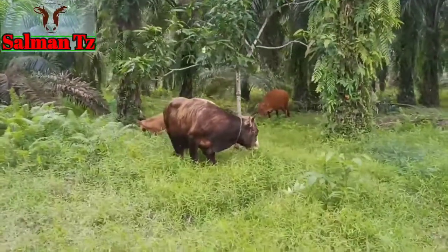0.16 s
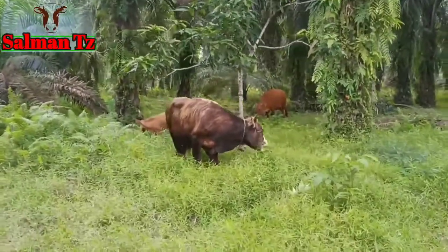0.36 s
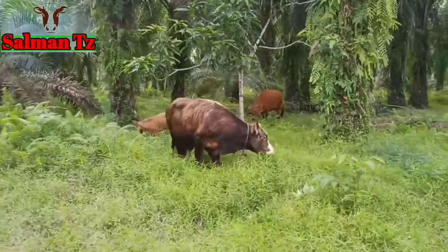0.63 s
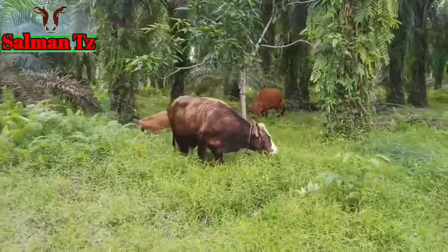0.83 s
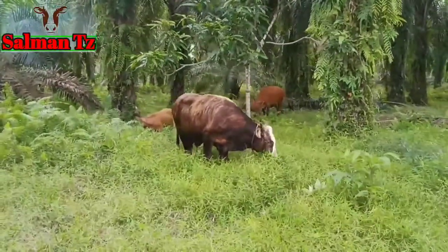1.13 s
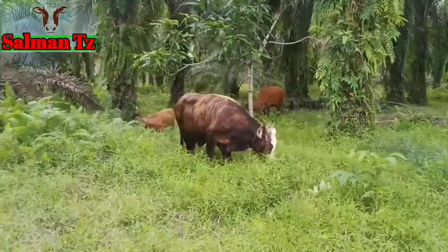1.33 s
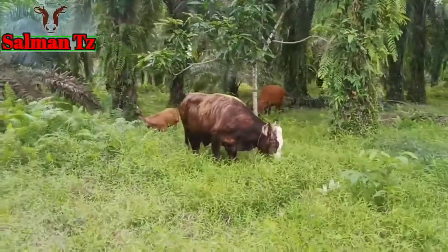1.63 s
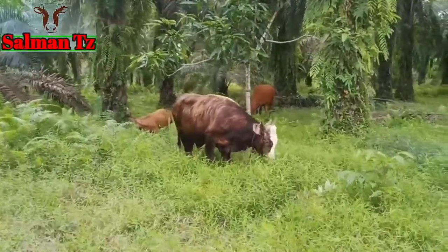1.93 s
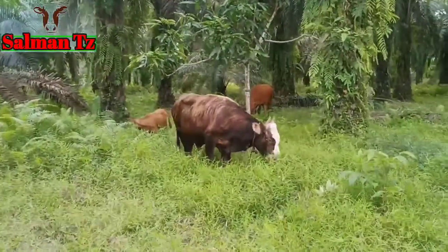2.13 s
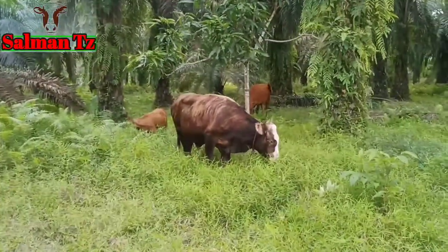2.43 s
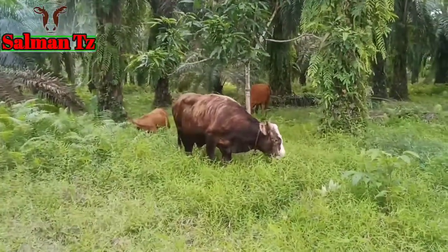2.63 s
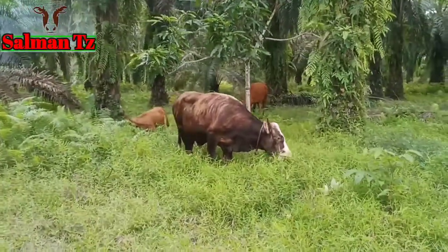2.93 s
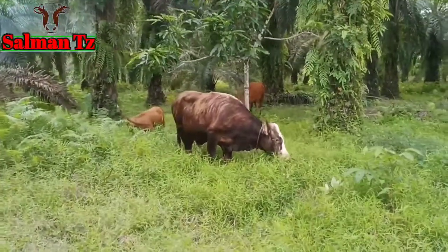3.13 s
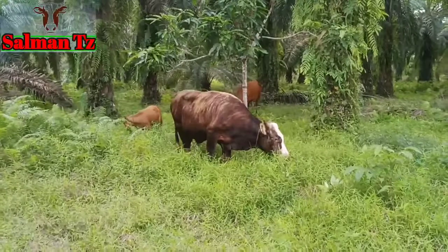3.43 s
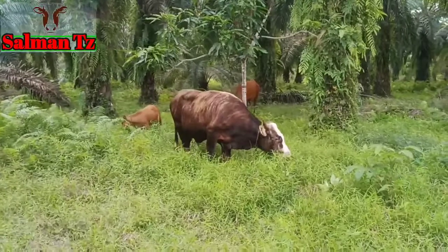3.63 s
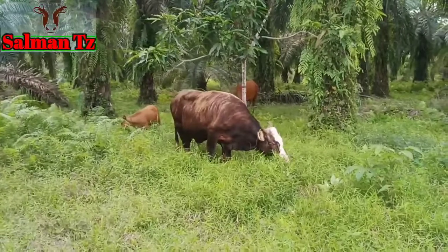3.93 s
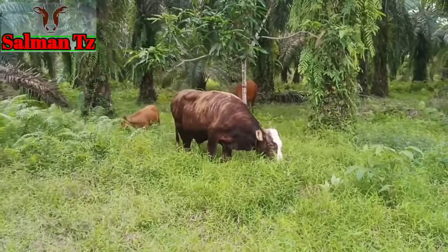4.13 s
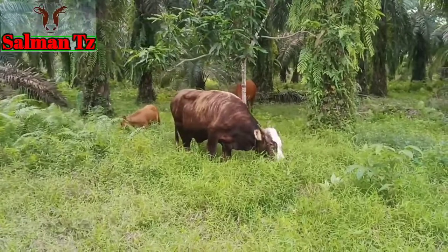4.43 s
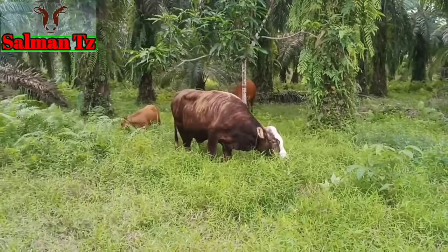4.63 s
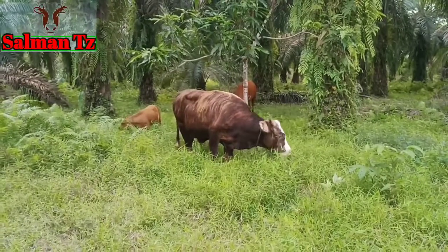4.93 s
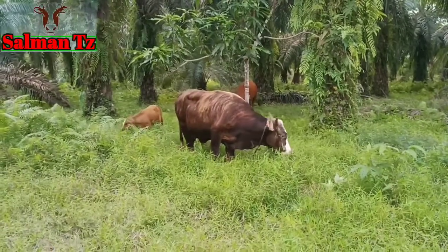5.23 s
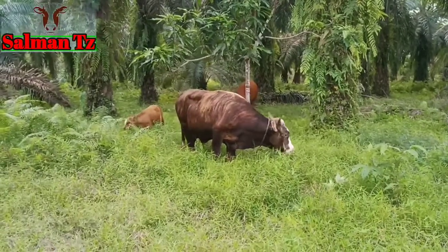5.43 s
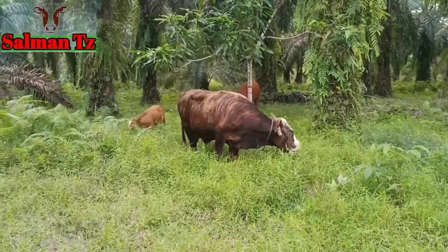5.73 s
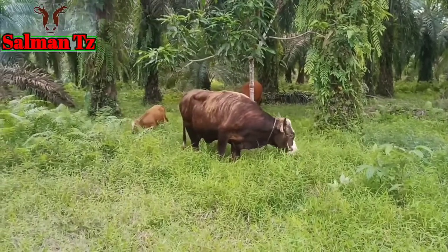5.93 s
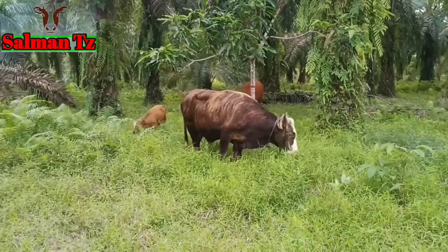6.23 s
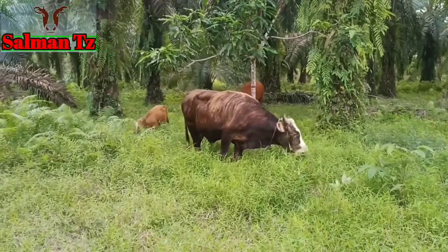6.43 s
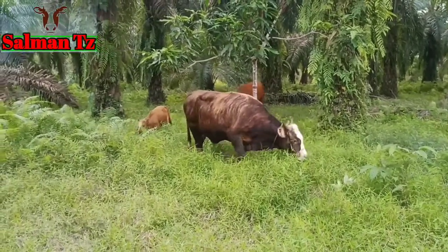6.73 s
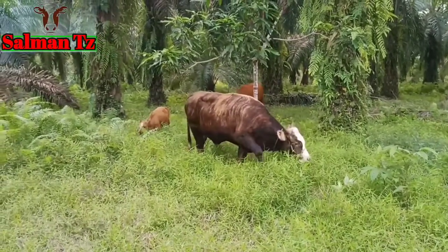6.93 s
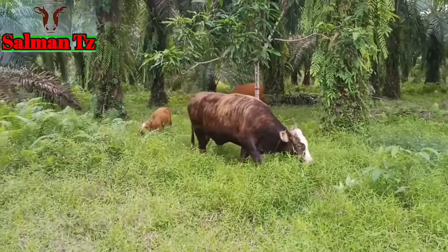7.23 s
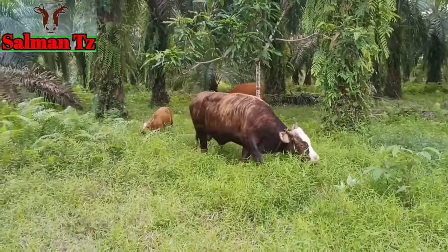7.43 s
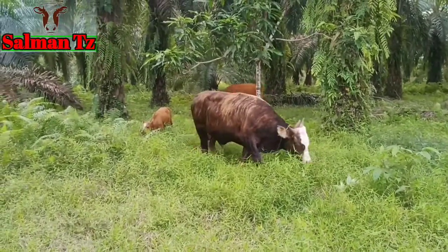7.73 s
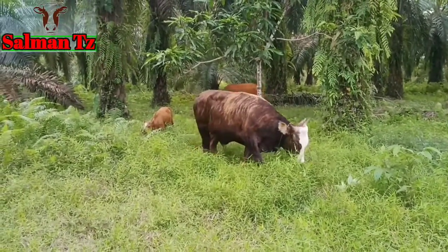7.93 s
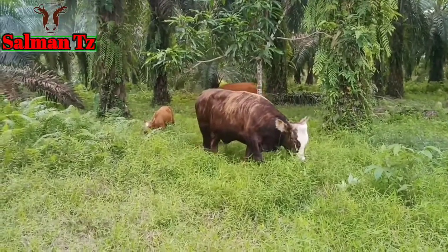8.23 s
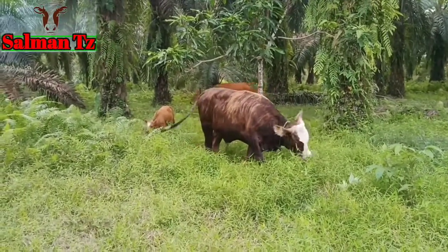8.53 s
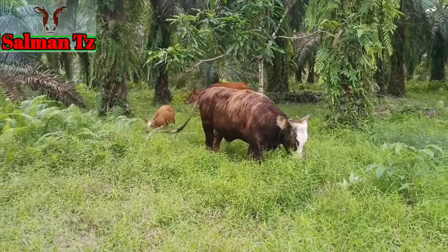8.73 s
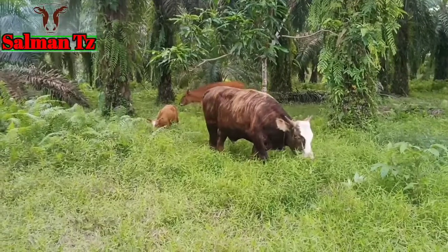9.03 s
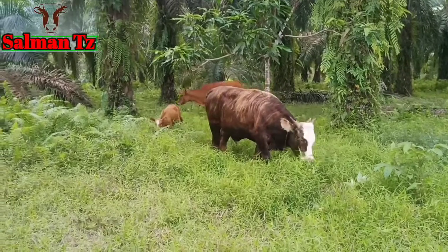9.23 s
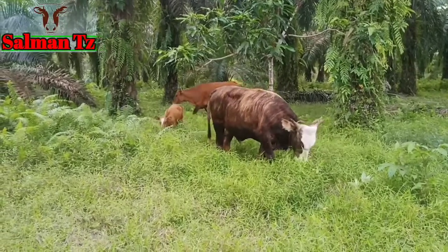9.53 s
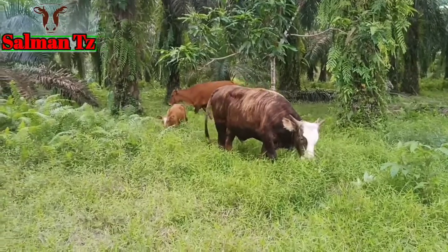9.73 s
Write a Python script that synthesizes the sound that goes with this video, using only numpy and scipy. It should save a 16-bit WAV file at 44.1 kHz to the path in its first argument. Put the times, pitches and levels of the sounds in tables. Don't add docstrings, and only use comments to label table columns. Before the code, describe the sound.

Cattle tear and crop grass close by with crisp snaps and ticks, under thin high insect whine, a chirping cricket and faint distant engines.

```python
import sys
import numpy as np
from scipy import signal
from scipy.fft import rfft, irfft, next_fast_len
from scipy.io import wavfile
from scipy.ndimage import uniform_filter1d

SR = 44100
rng = np.random.default_rng(int(sys.argv[2]) if len(sys.argv) > 2 else 0)


def makeup_ratio(level_db):
    decades = np.asarray(level_db, float) / 20
    return 10 ** decades


def waveform_to_disk(signal):
    frames = np.transpose(np.atleast_2d(signal))
    scaled = np.clip(frames, -1, 1) * 32767
    samples = np.round(scaled).astype(np.int16)
    wavfile.write(sys.argv[1], SR, samples)


N = 435311

# [f/Hz, density/dB per Hz]
AIR_SPECTRUM = [(26, -18), (50, -3), (90, 0), (146, 0), (250, -9.5), (700, -21.5), (2200, -35), (3500, -28),
                (4600, -19.5), (5600, -27), (6400, -34), (7700, -29), (12300, -26.5), (15600, -8.5)]
AIR_DB = -52.5

# [t/s, level/dB, fineness/dB]
STIR = [(0, -57, -19), (.6, -56.5, -4.5), (1.3, -54, -5), (2.2, -62, -5), (3.3, -60, -7), (3.65, -72, -4),
        (4.7, -72, -6), (6.4, -68.5, 3), (7.45, -61.5, -0.5), (8.2, -63.5, 0), (8.75, -67.5, -5),
        (9.4, -63.5, -2.5), (9.87, -70.5, 7)]
# [start/s, hold/s, level/dB, fineness/dB]
SWEEPS = [(0, 0.08, -47, -9.5), (0.11, 0.044, -46.5, -9), (0.204, .04, -57, -10), (0.917, 0.062, -53, -2.5),
          (1.07, 0.045, -52, -9), (1.367, 0.19, -53.5, -13.5), (1.73, .02, -61, -10),
          (1.91, 0.034, -64, -2), (2.117, 0.047, -56, 0), (2.324, .03, -57, -1), (2.378, .03, -48, -6),
          (2.44, 0.046, -46, -9), (2.527, .04, -46.5, -9), (2.6, 0.076, -46.5, -8.5),
          (2.72, 0.11, -49.5, -10.5), (3.03, 0.02, -67, 8), (4.035, 0.22, -65.5, 2), (4.478, 0.033, -73, 2),
          (5.016, 0.031, -58.5, 1), (5.52, 0.033, -73, 0), (5.85, 0.025, -69, 9), (6.14, 0.027, -60, 0.5),
          (6.519, 0.048, -66, 3), (6.871, .1, -58.5, 0), (7.052, 0.024, -54, 4), (7.11, 0.048, -50.5, 2),
          (7.608, .08, -62.5, 4), (7.757, 0.074, -57, 4), (7.876, 0.096, -53, 0.5), (8.077, 0.018, -57, 4),
          (8.39, 0.085, -61.5, 1), (8.866, 0.04, -60.5, 4), (9.067, 0.028, -67, 5),
          (9.255, 0.033, -60.5, 4.5), (9.593, 0.049, -57, 3), (9.71, 0.11, -64, -6)]
RISE_DB_PER_S, FALL_DB_PER_S = 139, 148
LONG_SWEEP_S = 1
QUIET_DB = -72
# [f/Hz, density/dB per Hz]
SWISH_SPECTRUM = [(1600, -79), (2500, -11), (3490, -4.5), (4120, 0.5), (5900, -5.5), (7070, -0.5),
                  (8800, -21), (11800, -20.5), (13200, -14.5), (14900, -2), (15700, -11)]
# [f/Hz, density/dB per Hz]
HISS_SPECTRUM = [(5000, -72), (7600, 5.5), (9000, 5.5), (10500, -2), (12500, -7), (15700, -2)]
# [f/Hz, density/dB per Hz]
RUSTLE_SPECTRUM = [(800, -0.5), (1300, 5), (2000, 5), (3000, 3), (4200, -7)]
# [f/Hz, density/dB per Hz]
SHUFFLE_SPECTRUM = [(200, -5), (350, 4.5), (700, 3.5), (1100, -7), (1700, -42)]
# [quiet level/dB, share of swing, dB per dB of fineness, slowness]
RUSTLE_LAW = (-76.5, 0.5222, -0.58, 1.5)
SHUFFLE_LAW = (-73, 0.393, 0.02, 1)
TEARING_LAW = (-87.5, 1.0558, -0.98, 0.5)
PATCH_RATE_HZ, SWISH_PATCHY_DB = 12, .4

# [t/s, level/dB]
CHORUS_LEVEL = [(0.0, -57), (0.3, -57.5), (0.85, -53.5), (1.24, -73), (1.65, -55), (2.14, -60.5),
                (2.53, -49), (2.83, -56.5), (5.66, -60), (5.97, -58), (6.4, -60.5), (6.98, -59),
                (7.51, -58), (8.91, -58), (9.46, -56.5), (9.87, -58.5)]
# [f/Hz, width/Hz, level/dB]
CHORUS_BANDS = [
    (7440, 130, -5.5),
    (7200, 260, 2),
    (6880, 130, -5.5),
    (8350, 1350, -2),
]
# [start/s, end/s, f/Hz, width/Hz, level/dB]
SINGERS = [
    (4.2, 9.87, 8582, 22, -73.5),
    (3.0, 4.05, 9200, 110, -68.5),
    (4.2, 4.9, 9150, 110, -70.5),
    (4.45, 5.0, 4780, 400, -67.5),
    (2.95, 3.9, 4850, 300, -64),
    (6.4, 7.25, 770, 50, -73),
]

# [t/s, peak level/dB, f/Hz, t60/s]
SNAPS = [(0.109, -30, 3100, 0.023), (0.1779, -33.5, 2530, 0.023), (0.2056, -27, 3000, 0.032),
         (0.2164, -27, 2190, 0.028), (0.2188, -33, 2160, 0.023), (0.2433, -39, 2400, 0.019),
         (0.4207, -35.5, 2870, 0.042), (0.4565, -40, 1860, 0.026), (0.462, -44, 1850, 0.034),
         (0.4744, -42, 2450, 0.019), (0.5, -36.5, 1560, 0.036), (0.7095, -35.5, 3100, 0.034),
         (0.7435, -44, 1910, 0.05), (0.84, -35.5, 1040, 0.075), (1.509, -31, 1510, 0.016),
         (1.5146, -38, 2430, 0.07), (1.9778, -42.5, 2198, 0.027), (2.112, -38.5, 1076, 0.038),
         (2.2026, -38.5, 2586, 0.042), (3.1332, -45.5, 1270, 0.025), (2.9102, -42, 2040, 0.022),
         (2.9367, -35.5, 2080, 0.024), (2.951, -46, 2030, 0.025), (3.006, -36, 1560, 0.036),
         (3.0818, -37.5, 1920, 0.015), (3.2955, -46, 1900, 0.023), (8.3653, -39.5, 2960, 0.02),
         (9.7846, -48, 1513, 0.023), (0.507, -40, 2470, 0.03), (0.471, -42, 3450, .02),
         (0.649, -39, 3790, .02), (0.752, -36, 3740, .02), (0.994, -44, 1600, .02), (0.994, -46, 2250, .02),
         (1.511, -29, 1940, 0.017), (1.533, -40, 2650, .025), (1.625, -46, 1810, .02),
         (1.948, -44, 2330, .02), (2.095, -46, 2150, 0.017), (2.791, -41, 1600, .025),
         (2.884, -51, 1500, 0.021), (8.367, -42, 1620, .015), (0.841, -43, 1620, .03),
         (7.434, -54, 1550, .02), (7.054, -40, 14600, 0.044), (9.615, -39, 15000, 0.037),
         (2.204, -39.5, 1100, .012), (0.4585, -37, 1430, 0.034), (0.7465, -44, 1970, .03)]
# [t/s, peak level/dB, f/Hz]
TWIGS = [(0.109, -30, 4300), (0.1855, -34, 4770), (0.2188, -29, 3760), (0.2357, -29, 4540),
         (0.317, -33, 4310), (0.3597, -39, 3690), (0.421, -36, 4230), (0.4942, -30.5, 3820),
         (0.6428, -38, 3880), (0.7098, -34, 3870), (0.745, -33, 3800), (0.9053, -41, 4410),
         (1.0884, -35, 4020), (1.5125, -31, 4400), (1.878, -45, 3190), (2.7915, -34, 3520),
         (2.8093, -31, 4380), (2.8786, -35, 4350), (2.88, -34, 2960), (2.936, -36, 5030),
         (3.0823, -33, 4320), (3.092, -34, 3580), (3.5165, -42, 4968), (7.9133, -33, 4500),
         (7.9638, -31.5, 4240), (8.0721, -37, 4930), (8.366, -35, 4280), (9.7807, -43, 3640),
         (1.4006, -44, 3230), (3.489, -54, 3100), (0.205, -38, 5000), (0.225, -30, 4340),
         (0.253, -39, 4500), (0.264, -43, 3650), (0.326, -40, 3580), (0.394, -41, 4100), (0.460, -44, 4100),
         (0.718, -39, 5170), (1.555, -37, 5000), (1.597, -35, 5700), (2.898, -36, 5450), (3.255, -39, 5370),
         (3.517, -50, 3840), (5.532, -48, 4140), (7.358, -44, 3270), (3.040, -40, 6030), (3.175, -38, 5800),
         (3.296, -41, 5900), (5.011, -44, 5510), (0.451, -41, 6150), (0.501, -39, 5540), (2.813, -35, 6030)]
# [t/s, peak level/dB, f/Hz]
TICKS = [(0.1155, -35, 7320), (0.2188, -41, 7280), (0.2342, -41, 5700), (0.3056, -39, 7080),
         (0.4203, -35, 6160), (0.494, -34, 5750), (0.5346, -36, 7070), (0.7085, -35, 8500),
         (0.7115, -37, 10500), (4.484, -43, 3800), (1.5099, -42, 7030), (2.8104, -25, 7260),
         (2.881, -27, 7200), (3.5168, -34, 7180), (5.5303, -41, 8440), (5.843, -40, 7360),
         (7.9637, -16.5, 8200), (7.9656, -34, 7000), (8.053, -35, 7500), (8.368, -28.5, 7200),
         (9.587, -35, 7280), (9.6127, -36, 8120), (0.4895, -36, 7920), (0.5515, -33, 8610),
         (0.1105, -31, 4300), (0.235, -22.5, 4960), (8.367, -35, 4005), (0.567, -46, 9000),
         (1.3675, -30, 9130), (2.9035, -39, 8500), (2.8115, -37, 14470), (8.8665, -34, 8100),
         (9.6255, -35, 9990), (0.3075, -35, 5300), (3.1941, -32, 7330), (3.4082, -38, 7320)]
# [t/s, peak level/dB, f/Hz, t60/s]
KNOCKS = [(0.177, -43, 550, 0.055), (0.8435, -34.5, 330, 0.031), (0.858, -40, 453, 0.021),
          (0.991, -43, 840, 0.021), (1.203, -32, 500, 0.011), (1.207, -38, 800, 0.028),
          (1.216, -41.5, 353, 0.022), (9.779, -45, 525, 0.024), (1.394, -39.5, 520, 0.024),
          (0.3386, -44, 1360, 0.032), (1.758, -46.5, 930, 0.055), (1.89, -49, 1050, 0.023),
          (1.919, -46.5, 475, 0.061), (2.11, -32.5, 240, 0.018), (2.202, -43, 267, 0.012),
          (2.242, -46, 310, 0.018), (2.306, -36.5, 466, 0.016), (2.328, -35.5, 230, 0.027),
          (2.782, -39.5, 550, 0.019), (2.789, -37, 515, 0.027), (2.809, -38.5, 960, 0.033),
          (3.056, -53, 1010, 0.024), (4.489, -51, 278.1, 0.023), (7.356, -41, 239, 0.052),
          (7.919, -46, 377, 0.022), (2.7915, -48, 960, 0.058), (1.2056, -43, 1190, 0.035),
          (0.5194, -44, 1104, 0.033), (1.234, -45, 484, .025), (1.42, -42, 214, 0.046),
          (7.922, -51, 730, .02), (7.963, -48, 730, .015), (6.162, -52, 646, 0.028)]
TWIG_T60_S, TICK_T60_S = 0.02, .0025
CRACK_TOP = 3.3

# [t/s, f/Hz, level/dB]
ENGINES = [
    [(3.2, 135, -60), (3.5, 145.9, -64), (4.2, 141.6, -59), (4.6, 129.9, -59.5), (5.3, 131.3, -64.5),
     (5.9, 127.8, -53.5), (6.4, 113.5, -58.5), (6.9, 92, -60), (7.2, 86.1, -83)],
    [(0.4, 149.8, -58), (0.9, 156.2, -68), (1.5, 164, -53.5), (2, 163.4, -66), (3.4, 168.2, -68),
     (3.8, 173.5, -56), (4.5, 187.8, -70), (4.8, 163, -62), (5.5, 164.5, -59.5), (5.9, 172, -64),
     (6.4, 181.8, -59.5), (7, 153.1, -60), (7.6, 161.7, -58.5), (8.4, 160.2, -59.5), (9.87, 168.2, -61)],
]

# [t/s, chirps sung so far]
BOUTS = [
    [(1.241, 0), (1.916, 17)],
    [(2.997, 0), (3.789, 20), (4.189, 30), (4.436, 36)],
    [(5.007, 0), (5.408, 10), (6.002, 25), (6.520, 38)],
    [(7.039, 0), (7.276, 6), (7.631, 15), (7.834, 20), (8.351, 33)],
    [(9.055, 0), (9.755, 17)],
]
BOUT_DB = [-54.5, -54.5, -54, -52.5, -54]
CRICKET_HZ, PULSE_GAP_S = 5227, 0.0098
CRICKET_SAG_PER_S, CRICKET_BEND = 6, .01
CRICKET_FLUTTER_DB, CRICKET_SCATTER_DB = 1.5, -26

# [t/s, length/s, top f/Hz, arch share, level/dB]
CLUCKS = [
    (7.299, 0.031, 383, 0.18, -51),
    (8.18, 0.0307, 410.7, 0.28, -47),
    (9.069, 0.0335, 430, 0.303, -46),
]
CLUCK_ORDERS_DB = [-6, -0.5, -2.5, -24, -17, -13.5, -28]
# [lag/s, level/dB]
TRUNK_ECHOES = [
    (.026, -13),
    (.05, -24),
]
THROAT_HZ, THROAT_WIDTH_HZ, THROAT_DB = 685, 100, 6.5

MIC_LOW_HZ, TOP_HZ = 46.8, 15720
OFFSET = -.0003


def rms_one(x):
    return x / np.sqrt(np.mean(x ** 2) + 1e-20)


def in_time(rows):
    s, *columns = np.transpose(rows)
    return [np.interp(np.arange(N) / SR, s, c) for c in columns]


def drift(rate):
    r = np.exp(-80 * np.pi * rate / SR)
    coarse = rng.standard_normal(N // 40 + 2002)
    slow = signal.lfilter([1], [1, -2 * r, r * r], coarse)[2000:]
    return np.interp(np.arange(N) / 40, np.arange(len(slow)), rms_one(slow))


def resonance(x, hz, width):
    r = np.exp(-np.pi * width / SR)
    poles = [1, -2 * r * np.cos(2 * np.pi * hz / SR), r * r]
    return signal.lfilter([(1 - r * r) / 2, 0, (r * r - 1) / 2], poles, x)


def resonance_twice(x, hz, width):
    return resonance(resonance(x, hz, width), hz, width)


def coloured(x, spectrum, patchy_db, ref_hz):
    size = next_fast_len(N // 4096 + 1) * 4096
    hz = np.maximum(np.arange(size // 2 + 1) * SR / size, 1)
    points = np.array(spectrum)
    gain_db = np.interp(np.log(hz), np.log(points[:, 0]), points[:, 1], left=-90, right=-90)
    shaped = rfft(x, size) * makeup_ratio(gain_db)
    shaped /= np.std(irfft(shaped * (hz > ref_hz[0]) * (hz < ref_hz[1]), size))
    shaped = shaped.astype(np.complex64)
    place = 2 * np.log2(hz).astype(np.float32)
    out = np.zeros(N)
    for k in range(int(2 * np.log2(points[0, 0])), int(2 * np.log2(points[-1, 0])) + 2):
        band = irfft(shaped * np.clip(1 - abs(place - k), 0, 1), size)[:N]
        out += makeup_ratio(patchy_db * drift(PATCH_RATE_HZ)) * band
    return out


def add(out, s, sound):
    i = round(s * SR)
    out[i:i + len(sound)] += sound[:N - i]


def still_air():
    return makeup_ratio(AIR_DB - 2.0) * coloured(rng.standard_normal(N), AIR_SPECTRUM, 1.0, (30, 6500))


def grains(per_s, spread_db, hiss):
    sizes = makeup_ratio(spread_db * np.minimum(rng.exponential(1, N), 4)) * rng.choice([-1, 1], N)
    return rms_one(sizes * (rng.random(N) < per_s / SR)) + hiss * rng.standard_normal(N)


def motion(quiet_db, follows, per_fine, slowness):
    t = np.arange(0, N, 64) / SR
    stir_db, fine_db = (column[::64] for column in in_time(STIR))
    power = makeup_ratio(2 * (follows * (stir_db - QUIET_DB) + per_fine * fine_db))
    for start, hold, db, fine in SWEEPS:
        before_db = RISE_DB_PER_S * (start - t)
        after_db = FALL_DB_PER_S * (t - start - hold)
        away_db = np.maximum(before_db, after_db).clip(0) / slowness / (1 + abs(hold) / LONG_SWEEP_S)
        power = power + makeup_ratio(2 * (follows * (db - QUIET_DB) + per_fine * fine - away_db))
    return makeup_ratio(quiet_db) * np.interp(np.arange(N) / SR, t, np.sqrt(power))


def grass():
    clump, blades = drift(41), grains(9000, 3.5, 0.71)
    swish = coloured(blades, SWISH_SPECTRUM, SWISH_PATCHY_DB, (5400, 6600))
    swish *= motion(-74.0, 0.9, 0, 0.91) * makeup_ratio(0.76 * clump)
    hiss = coloured(blades, HISS_SPECTRUM, 0.8, (9600, 12500))
    hiss *= motion(-77.5, 0.93, 0.94, 1.0) * makeup_ratio(1.3 * clump)
    rustle = coloured(grains(900, 1.3, 1.0), RUSTLE_SPECTRUM, 1.35, (1400, 3000))
    rustle *= motion(*RUSTLE_LAW) * makeup_ratio(0.86 * clump)
    shuffle = coloured(grains(300, 3.0, 1.0), SHUFFLE_SPECTRUM, 2.9, (350, 1100))
    shuffle *= motion(*SHUFFLE_LAW)
    tearing = rms_one(resonance_twice(blades, 5900, 1700))
    tearing *= motion(*TEARING_LAW) * makeup_ratio(3.2 * drift(40))
    return tearing + swish + hiss + rustle + shuffle


def narrow_noise(hz, width):
    return rms_one(resonance_twice(rng.standard_normal(N), hz, width))


def chorus():
    level_db, = in_time(CHORUS_LEVEL)
    out, t = np.zeros(N), np.arange(N) / SR
    for hz, width, db in CHORUS_BANDS:
        flutter_db = 0.2 * drift(46) + 1.0 * drift(0.73)
        out += makeup_ratio(level_db - 1.5 + db + flutter_db) * narrow_noise(hz, width)
    for start, end, hz, width, db in SINGERS:
        on = np.clip(np.minimum(t - start, end - t) / 0.017, 0, 1)
        out += on * makeup_ratio(db + 0.63 * drift(30)) * narrow_noise(hz, width)
    return out


def breaks(events, rise_s, rasp_db, crack_db, crack_s, trim_db):
    out, t = np.zeros(N), np.arange(2600) / SR
    parting = round(1.488 * rise_s * SR)
    for s, peak_db, hz, t60 in events:
        fibres = rng.standard_normal(len(t))
        rasp = makeup_ratio(rasp_db) * rms_one(resonance(fibres, hz, 0.18 * hz))
        swell = (1 - np.exp(-t / rise_s)) ** 2 * makeup_ratio(-60 * t / max(t60, .002))
        body = swell * (np.sin(2 * np.pi * hz * t) + rasp)
        splinters = np.roll(fibres * makeup_ratio(-17.5 - 60 * t / crack_s), parting)
        splinters[parting] += 1
        crack = resonance(splinters, min(1.25 * hz, 9000), 2.6 * hz)
        dull = signal.butter(4, min(CRACK_TOP * hz, 8500), fs=SR, output="sos")
        crack = signal.sosfilt(dull, crack)
        sound = body / abs(body).max() + makeup_ratio(crack_db) * crack / abs(crack).max()
        add(out, s, makeup_ratio(peak_db + trim_db) * sound / abs(sound).max())
    return out


def stems():
    twigs = [(s, db, hz, TWIG_T60_S) for s, db, hz in TWIGS]
    ticks = [(s, db, hz, TICK_T60_S) for s, db, hz in TICKS]
    out = breaks(SNAPS, 0.000783, -1.8, 2.0, 0.0063, 0.32)
    out += breaks(twigs, 0.00033, -2.3, -1.3, 0.0041, 0.35)
    out += breaks(ticks, .0001, -5.0, -8, 0.0024, 0.57)
    return out + breaks(KNOCKS, .0018, -4.0, -0.98, 0.0082, 0.43)


def engines():
    out = np.zeros(N)
    for rows in ENGINES:
        first, last = rows[0], rows[-1]
        faded = [(first[0] - .3, first[1], -90), *rows, (last[0] + 0.33, last[1], -90)]
        hz, level_db = in_time(faded)
        phase = 2 * np.pi * np.cumsum(hz + 1.36 * drift(5.9)) / SR
        tone = np.sin(phase) + makeup_ratio(-18.5) * np.sin(2 * phase)
        out += makeup_ratio(level_db + 0.3 + 3.0 * drift(12)) * tone
    return out


def cricket():
    out, t = np.zeros(N), np.arange(400) / SR
    envelope = np.exp(-((t - .0045) / .0021) ** 2)
    for rows, level_db in zip(BOUTS, BOUT_DB):
        s, count = np.transpose(rows)
        starts = np.interp(np.arange(count[-1] + 1), count, s) - .005
        for start in starts:
            a, b, c, d = rng.standard_normal(4)
            for lag, db, bend in ((0, 0.66 * a - 1, c), (PULSE_GAP_S, 0.43 * b, d)):
                hz = CRICKET_HZ * (1 + CRICKET_BEND * bend - CRICKET_SAG_PER_S * t)
                add(out, start + lag, makeup_ratio(level_db + db) * envelope * np.sin(2 * np.pi * hz * t))
    out = out * makeup_ratio(CRICKET_FLUTTER_DB * drift(130))
    scatter = rng.standard_normal(3000) * makeup_ratio(CRICKET_SCATTER_DB - 60 * np.arange(3000) / SR / 0.09)
    return out + signal.fftconvolve(out, scatter)[:N]


def fowl():
    out = np.zeros(N)
    for s, length, top_hz, arch, level_db in CLUCKS:
        part = np.linspace(0, 1, int(length * SR))
        phase = 2 * np.pi * np.cumsum(top_hz * (1 - arch * (2 * part - 1.1) ** 2)) / SR
        breath = rng.standard_normal((len(CLUCK_ORDERS_DB), 2500))
        hoarse = uniform_filter1d(breath, 60)[:, :len(part)]
        opening = np.sin(np.pi * part)
        voice = np.zeros(len(part))
        for k, db in enumerate(CLUCK_ORDERS_DB):
            swell = opening ** (0.45 + 0.3 * min(k, 3))
            rough = 1 + (1.5 + 0.35 * k * k) * hoarse[k]
            voice += makeup_ratio(db) * swell * rough * np.sin((k + 1) * phase)
        add(out, s, makeup_ratio(level_db + 0.5) * voice)
    out += makeup_ratio(THROAT_DB) * resonance(out, THROAT_HZ, THROAT_WIDTH_HZ)
    reflected = resonance(out, 1700, 2500)
    for lag, db in TRUNK_ECHOES:
        out += makeup_ratio(db) * np.roll(reflected, round(lag * SR))
    scatter = rng.standard_normal(6000) * makeup_ratio(-25 - 60 * np.arange(6000) / SR / 0.17)
    return out + signal.fftconvolve(out, resonance_twice(scatter, 1900, 2000))[:N]


def scene():
    mono = still_air() + grass() + chorus() + stems() + engines() + cricket() + fowl()
    return np.array([mono, mono])


def roll_off(x):
    return signal.sosfilt(signal.butter(12, 16840, fs=SR, output="sos"), x)


def record(dry):
    bass_cut = signal.butter(2, MIC_LOW_HZ, "high", fs=SR, output="sos")
    treble_cut = signal.cheby2(20, 60, TOP_HZ, fs=SR, output="sos")
    mix = signal.sosfilt(bass_cut, dry) + OFFSET
    mix = signal.sosfilt(treble_cut, mix)
    return roll_off(mix)


dry = scene()
out = record(dry)
waveform_to_disk(out)
```